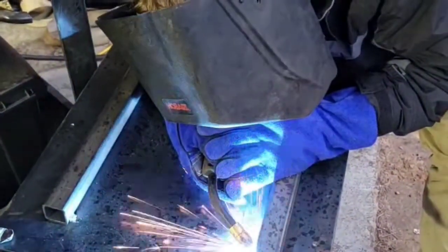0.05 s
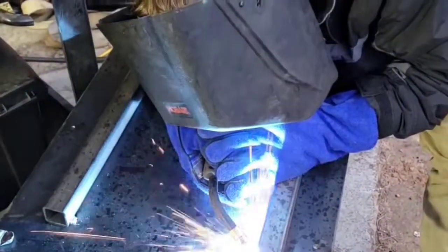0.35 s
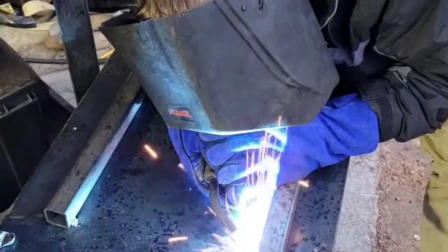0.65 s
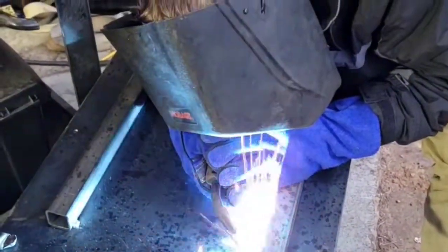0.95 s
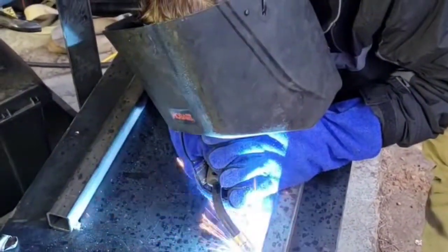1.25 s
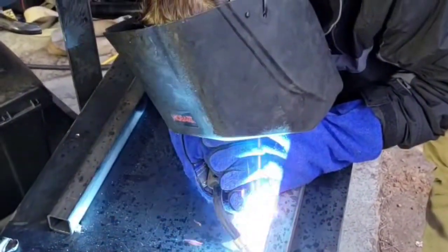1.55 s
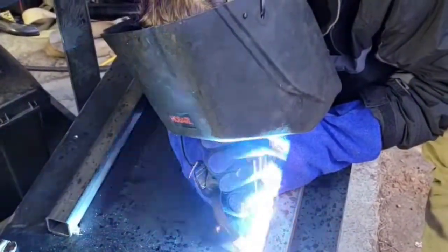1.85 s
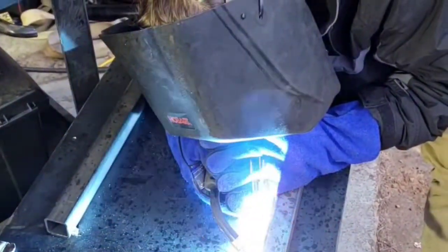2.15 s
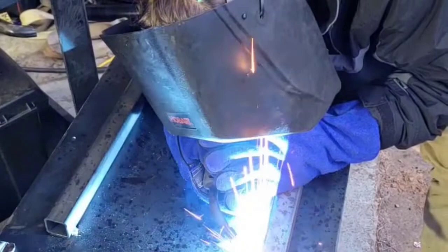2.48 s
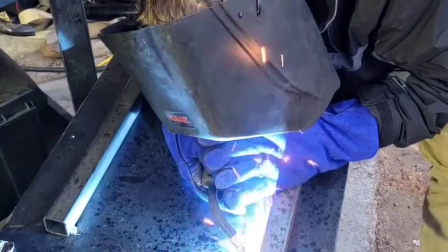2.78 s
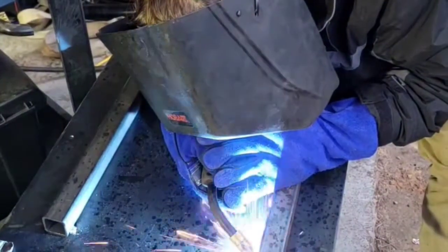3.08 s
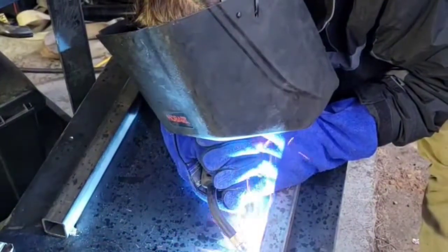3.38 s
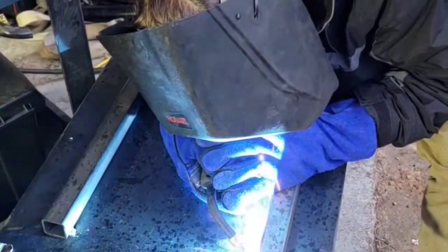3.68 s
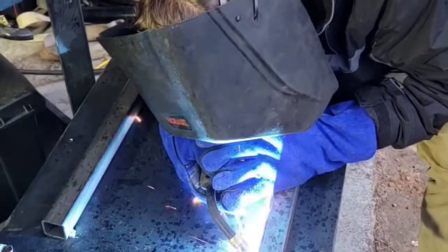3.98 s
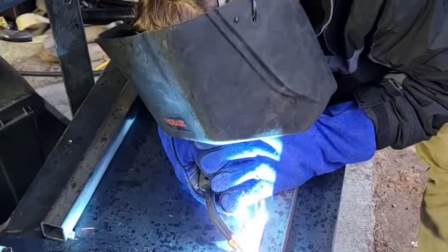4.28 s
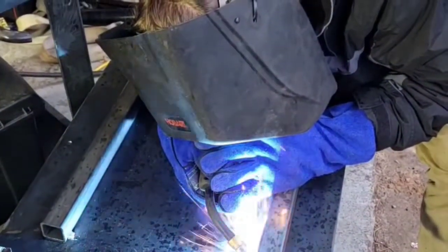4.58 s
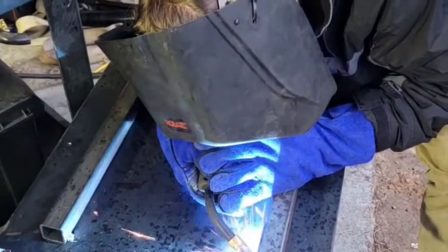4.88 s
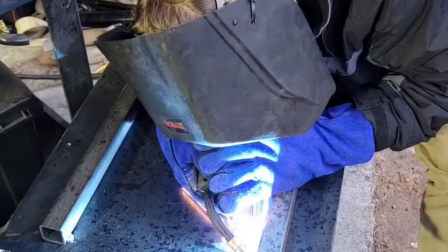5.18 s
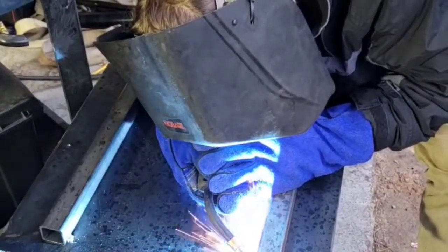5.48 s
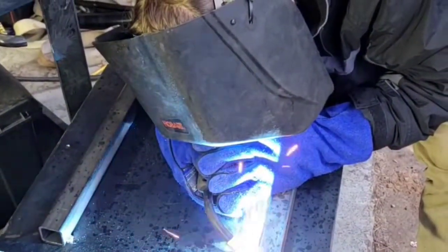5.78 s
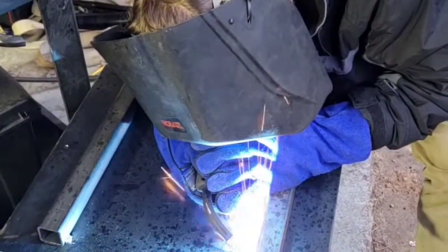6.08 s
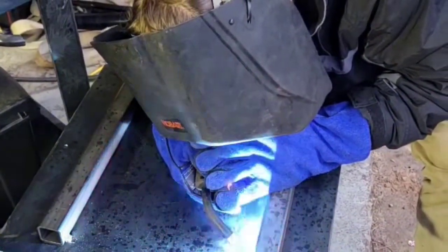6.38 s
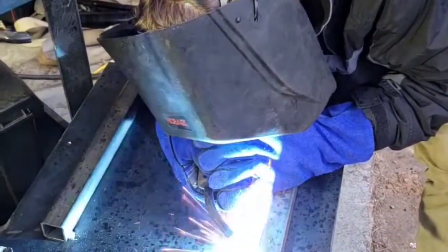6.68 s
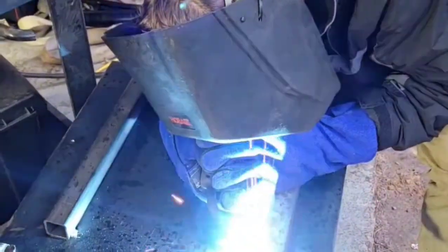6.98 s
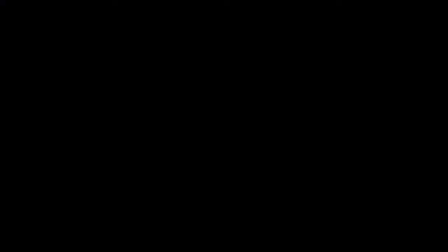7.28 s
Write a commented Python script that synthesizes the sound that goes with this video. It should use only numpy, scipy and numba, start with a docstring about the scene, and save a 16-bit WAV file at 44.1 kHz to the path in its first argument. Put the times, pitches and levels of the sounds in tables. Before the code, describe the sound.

Close arc welding on steel crackles and sizzles fiercely over a low generator hum, then everything stops abruptly.

```python
"""A fierce, close crackle over a sizzle: wire-feed arc welding on a steel bench. The wire shorts into the
molten pool about 115 times a second. Each re-ignition is an impulse, a sharp snap that reflects between bench
and helmet and excites the modes of the steel. An engine generator hums behind, and a limiter ducks the hum when
the crackle surges. Just before seven seconds the sound stops dead."""
import sys
import numpy as np
from scipy import signal
from scipy.fft import rfft, irfft
from scipy.io import wavfile
from scipy.ndimage import uniform_filter1d, minimum_filter1d, map_coordinates
from numba import njit

SR = 44100
rng = np.random.default_rng(int(sys.argv[2]) if len(sys.argv) > 2 else 0)


def master_out(mix):
    """Clip the mix to full scale and print it as 16-bit PCM to the path in sys.argv[1]."""
    frames = np.transpose(np.atleast_2d(mix))
    ceiling = np.clip(frames, -1, 1)
    pcm = np.round(ceiling * 32767).astype(np.int16)
    wavfile.write(sys.argv[1], SR, pcm)


N = 328098
T = np.arange(N) / SR
STOP_S = 6.987
FIRING_HZ = 30  # mean firing rate of the engine

# fierceness of the arc, driving snaps, sizzle and hiss (time [s], relative level [dB])
CRACKLE_LEVEL = [(0.0, -30), (0.21, -23.5), (0.54, -21.5), (0.62, -30), (0.83, -25), (0.93, -31.5),
                 (0.97, -22), (1.22, -29.5), (1.48, -21.5), (1.67, -30), (1.81, -19), (1.87, -26.5),
                 (2.37, -21.5), (2.41, -31.5), (2.53, -20.5), (2.86, -25.5), (3.32, -21), (3.48, -27),
                 (3.81, -20.5), (4.14, -30), (4.31, -21.5), (4.45, -28.5), (4.51, -23.5), (4.88, -26.5),
                 (5.11, -18.5), (5.4, -24), (6.22, -26.5), (6.34, -24), (6.44, -32), (6.47, -20),
                 (6.96, -25.5), (6.98, -18.5)]
# pace set by the wire feed (time [s], short-circuit rate [Hz])
SHORTING_RATE = [(0, 104), (.5, 117), (1.6, 122), (2, 117), (2.4, 98), (2.65, 118), (3.9, 120), (4.15, 106),
                 (5, 113), (5.8, 117), (6.3, 104), (7, 108)]
# bursts of big drops that stand out of the crackle (time [s], relative level [dB])
BIG_DROPS = [(0.1441, -5), (0.3132, -3), (0.3511, -3), (1.1109, -4), (1.3104, -4), (2.3565, -4),
             (2.8529, -7), (3.1308, -4), (3.6117, -6), (4.2378, -5), (4.5057, -6), (4.6872, -5),
             (5.2041, -3), (5.247, -4), (6.2317, -5), (6.2866, -8), (6.3121, -5), (6.3629, -4),
             (6.4632, -5), (6.7286, -4)]
# spans in which the arc burns long and the wire does not touch the pool (start [s], end [s])
LONG_ARC_SPANS = [(6.26, 6.284), (6.366, 6.46)]
# spectrum of a snap's ringing body (frequency [Hz], relative level [dB])
BODY_SPECTRUM = [(150, -46), (900, -28.5), (1700, -27.5), (2200, -18), (3000, -18), (4300, -16.5),
                 (5100, -9.5), (5750, -1), (6300, -8), (6720, 3), (7150, -9), (7550, -6), (8100, -21.5),
                 (10000, -40.5)]
# spectrum of a snap's sharp edge (frequency [Hz], relative level [dB])
EDGE_SPECTRUM = [(5000, -33), (8000, -10.5), (9300, -0.5), (11500, -1), (12800, -2.5), (13900, -1),
                 (15000, -2.5), (15800, -13)]
# spectrum of the arc's sizzle (frequency [Hz], relative level [dB])
SIZZLE_SPECTRUM = [(200, -13), (1200, -17), (3000, -6.5), (4700, -4.5), (6500, -1.5), (7400, -4.5),
                   (8500, -8), (11300, -11.5), (13700, -24.5), (15800, -35)]
# spectrum of the arc's thin hiss (frequency [Hz], relative level [dB])
HISS_SPECTRUM = [(6000, -24.5), (11500, -19.5), (12800, 0.5), (14000, 1), (15800, -17)]
# reflections by way of bench and helmet (mean delay [ms], gain [dB])
ECHO_PATHS = [(1.191, -1), (2.38, -30.5), (3.551, -3), (5.12, -9)]
# modes of the steel (frequency [Hz], time to decay by 60 dB [s], gain at resonance [dB])
STEEL_MODES = [(1450, .018, 2.5), (1911, 0.023, 8.5), (2127, 0.021, 8), (2622, 0.068, 8), (3684, 0.051, 5),
               (4130, .07, 1.5), (4900, 0.049, 8), (5090, 0.11, -0.5), (5950, 0.023, -6), (6540, 0.046, 4),
               (6400, .07, -12.5), (6993, .08, -1), (7450, .08, 4.5), (7420, 0.064, -10)]
# loudness of the generator's hum, dipping where the crackle surges (time [s], relative level [dB])
GENERATOR_LEVEL = [(0.0, -28), (0.06, -26.5), (0.54, -29.5), (0.56, -29), (2.98, -24.5), (3.77, -27.5),
                   (4.99, -26.5), (5.07, -28.5), (5.21, -26), (6.33, -27), (6.46, -23.5), (6.95, -25.5)]
# exhaust and casing tones (harmonic number [multiple of the firing rate], relative level [dB])
ENGINE_HARMONICS = [(1, -24), (2, 0.5), (3, -26), (4, -12), (5, 1), (6, -20), (7, -21.5), (8, -28.5),
                    (9, -27.5), (10, -23.5), (12, -30.5), (13, -24), (14, -23.5), (15, -19), (16, -16.5),
                    (17, -13.5), (18, -23), (19, -26), (21, -20), (23, -24), (28, -26.5), (36, -24),
                    (37, -25), (40, -20), (43, -26.5)]
# spectrum of the engine's clatter (frequency [Hz], relative level [dB])
CLATTER_SPECTRUM = [(20, -12.5), (55, 0.5), (100, -1), (160, 3), (260, -2.5), (370, -7.5), (480, 2.5),
                    (680, 0.5), (900, -8.5), (1200, -4.5), (1650, -6), (3500, -16)]


def arc(cycles):
    """Source and filter: snaps and sizzle excite the workshop; a long arc gives no snaps."""
    crackle_db, = curves(CRACKLE_LEVEL)
    long_arc = sum(1. * (T > start) * (T < end) for start, end in LONG_ARC_SPANS)
    burning = sizzle(cycles, crackle_db - crackle_db.mean(), long_arc)
    impulses = short_circuits(crackle_db) * (1 - long_arc)
    return workshop(snaps(impulses) + burning)


def short_circuits(crackle_db, jitter=.1, spread_db=4.04, lull_s=.02, lull_db=-3.5, lock=.68):
    """Relaxation oscillation: one impulse per re-ignition, in uneven runs that each big drop restarts."""
    rate_hz, = curves(SHORTING_RATE)
    drops_fed = np.cumsum(rate_hz) / SR
    chance = rng.standard_normal((4096, 2))
    big_s, big_db = np.transpose(BIG_DROPS)
    lull = sum((T > s - lull_s) & (T < s) for s in big_s)  # the crackle falls back before a burst
    slosh_db = 1.7 * walk(25)  # the sloshing pool gives stronger and weaker runs
    level_db = crackle_db + 7 + slosh_db + lull_db * lull
    impulses = np.zeros(N)
    impulses[(big_s * SR).astype(int)] = undb(big_db - 6.8)
    run_bounds = np.interp(np.r_[0, np.sort(big_s), STOP_S], T, drops_fed)
    ripple_hz = 4 * FIRING_HZ
    used = 0
    for start, end in zip(run_bounds[:-1], run_bounds[1:]):
        count = max(1, round(end - start))
        wait, size = chance[used:used + count].T
        used += count
        gaps = np.exp(jitter * wait)
        gaps[-1] *= 1.4  # a big drop takes longer to grow
        elapsed = np.cumsum(gaps)
        onset_s = np.interp(start + (end - start) * elapsed[:-1] / elapsed[-1], drops_fed, T)
        # drops tend to part on the crests of the rectified current
        onset_s -= lock * np.sin(2 * np.pi * (ripple_hz * onset_s - .64)) / (2 * np.pi * ripple_hz)
        at = (onset_s * SR).astype(int)
        strength = np.tanh((wait + size)[:-1] / 2)  # louder after a longer wait
        impulses[at] = undb(level_db[at] + spread_db * strength)
    return impulses


def snaps(impulses, body_db=3, edge_db=17):
    """Impulse response: each re-ignition gives a ringing, echoing body and a sharp edge."""
    return undb(body_db) * bounces(snap_body(impulses)) + undb(edge_db) * snap_edge(impulses)


def snap_body(impulses, spit_db=-26, spit_s=.00064):
    """Damped resonance: each impulse, with a brief spit of noise, rings for a few cycles."""
    t = T[:SR // 100]
    spit = convolve(impulses, np.exp(-t / spit_s)) * rng.standard_normal(N)
    response = minimum_phase(BODY_SPECTRUM)
    body = convolve(impulses + undb(spit_db) * spit, response / np.abs(response).max())
    body = disperse(body, hz=6500, width_hz=2200)
    return disperse(body, hz=2800, width_hz=1800)


def snap_edge(impulses, decay_s=.0004, path_loss_db=-4, spray_db=-9, brighten=.17):
    """Rough-surface scattering: the short waves of each snap break up on the steel."""
    t = T[:SR // 100]
    arrivals = np.exp(-t / decay_s)
    # the highest frequencies survive only the two shortest paths
    for k, (ms, db) in enumerate(ECHO_PATHS[:2]):
        age = t - ms / 1000
        arrivals += undb(db + path_loss_db * k) * (age > 0) * np.exp(-np.abs(age) / decay_s)
    # harder snaps have a brighter edge
    sharp = impulses * (impulses / impulses[impulses > 0].mean()) ** brighten
    # fine spatter sprays differently from every drop
    spray = convolve(sharp, arrivals / np.linalg.norm(arrivals)) * rng.standard_normal(N)
    scattered = scatter(sharp, arrivals, count=6)
    edge = convolve(scattered + undb(spray_db) * spray, minimum_phase(EDGE_SPECTRUM))
    for hz in 13100, 13700, 14300:  # the brightest part lingers for a few milliseconds
        edge = disperse(edge, hz, width_hz=450)
    return edge


def sizzle(cycles, surge_db, long_arc, fizz_db=-32, hiss_db=-35, ripple=.067, fade_db=-10):
    """Amplitude modulation: noise pulses with the rectified current and, like the hiss, follows surges."""
    current = 1 + ripple * np.cos(2 * np.pi * (4 * cycles - .8))
    fizz = rng.standard_normal(N) * undb(3 * walk(550)) * current
    fizz = unit(convolve(fizz, minimum_phase(SIZZLE_SPECTRUM))) * undb(fizz_db + .49 * surge_db)
    hiss = noise(HISS_SPECTRUM) * undb(hiss_db + .7 * surge_db)
    burning = fizz + hiss
    # the top octave fades while the arc burns long
    treble = signal.sosfiltfilt(signal.butter(3, 7800, "high", fs=SR, output="sos"), burning)
    treble_gain = undb(fade_db * uniform_filter1d(long_arc, size=2048))
    return burning + (treble_gain - 1) * treble


def bounces(x, drift=.0025):
    """Comb filtering: close echoes add to the sound, their paths shortening as the torch travels."""
    stretch = 1 + drift * (1 - 2 * T / STOP_S)
    return x + sum(undb(db) * map_coordinates(x, [(T - ms / 1000 * stretch) * SR], order=3)
                   for ms, db in ECHO_PATHS)


def workshop(x, near_db=-13, near_t60=.06, room_db=-12, room_t60=.084, absorb_hz=12000):
    """Modal ringing and reverberation: the steel rings; nearby things and the room add a duller tail."""
    t = T[:SR // 4]
    ring, tail = 0, 0
    for hz, t60, db in STEEL_MODES:
        decay = undb(-60 * t / t60)
        ring = ring + undb(db) * np.cos(2 * np.pi * hz * t) * 2 * decay / decay.sum()
    for db, t60 in (near_db, near_t60), (room_db, room_t60):
        decay = undb(-60 * t / t60) * np.minimum(t / .0055, 1)
        tail = np.hypot(tail, undb(db) * decay / np.linalg.norm(decay))
    dull = signal.sosfilt(signal.butter(1, absorb_hz, fs=SR, output="sos"), x)
    return x + convolve(x, ring) + np.linalg.norm(tail) * scatter(dull, tail, count=4)


def scatter(x, envelope, count):
    """Diffuse reflection: random echo patterns under one envelope succeed each other as the torch moves."""
    out = 0
    for k in range(count):
        response = rng.standard_normal(len(envelope)) * envelope
        share = np.cos(np.pi / 2 * np.clip(T / T[-1] * (count - 1) - k, -1, 1))
        out = out + share * convolve(x, response / np.linalg.norm(response))
    return out


def disperse(x, hz, width_hz):
    """Group delay: a resonant all-pass path holds back the frequencies around its centre."""
    radius = np.exp(-np.pi * width_hz / SR)
    poles = [1, -2 * radius * np.cos(2 * np.pi * hz / SR), radius ** 2]
    return signal.lfilter(poles[::-1], poles, x)


def generator(cycles, hum_db=.9, clatter_db=-7.5, knock_depth=.93, knock_width=.036):
    """Harmonic series: a four-stroke single hums at multiples of its firing rate and knocks twice a cycle."""
    level_db, = curves(GENERATOR_LEVEL)
    hum = 0
    for order, db in ENGINE_HARMONICS:
        # the low tones are nearly steady, the casing tones vary from firing to firing
        waver_db = (3 * min(order / 20, 1) - .5) * walk(22)
        hum = hum + undb(db + waver_db) * np.sin(2 * np.pi * (order * cycles + rng.random()))
    knocks = sum(np.exp(-((cycles % 1 - phase) / knock_width) ** 2) for phase in (.48, .67))
    clatter = unit(noise(CLATTER_SPECTRUM) * (1 + knock_depth * knocks))
    return undb(level_db) * (undb(hum_db) * unit(hum) + undb(clatter_db) * clatter)


def engine_cycles():
    """Phase modulation: the count of engine cycles wanders as the governor lets the speed hunt."""
    return FIRING_HZ * T + .1 * walk(2.5) / (2 * np.pi)


def cooling_fan(hz=199.3, level_db=-50):
    """Simple harmonic motion: the fan gives one faint, steady tone."""
    return undb(level_db) * unit(np.sin(2 * np.pi * hz * T))


def undb(db):
    """Decibel law: level to amplitude ratio."""
    return 10 ** (np.asarray(db) / 20)


def unit(x):
    """Normalisation to rms 1."""
    return x / np.sqrt(np.mean(x ** 2))


def curves(table):
    """Linear interpolation of each column through time."""
    times, *columns = np.transpose(table)
    return [np.interp(T, times, column) for column in columns]


def walk(rate_hz):
    """Band-limited random fluctuation with a spread near 1."""
    knots = signal.resample(rng.standard_normal(4096), 4096 * 8)
    return np.interp(T * rate_hz, np.arange(len(knots)) / 8, knots)


def convolve(x, response):
    """Linear filtering by an impulse response."""
    return signal.fftconvolve(x, response)[:N]


def minimum_phase(spectrum, size=4096):
    """Causality: folding the cepstrum gives the most compact response with this spectrum."""
    hz, db = np.transpose(spectrum)
    bins_hz = np.maximum(np.arange(size // 2 + 1) * SR / size, 1)
    magnitude = undb(np.interp(np.log(bins_hz), np.log(hz), db))
    cepstrum = irfft(np.log(magnitude))
    cepstrum[1:size // 2] *= 2
    cepstrum[size // 2 + 1:] = 0
    return irfft(np.exp(rfft(cepstrum)))


def noise(spectrum):
    """Spectral shaping of white noise, at rms 1."""
    return unit(convolve(rng.standard_normal(N), minimum_phase(spectrum)))


@njit
def held_peak(x, retention):
    """Envelope detection: jumps to each peak, then decays exponentially."""
    envelope, peak = np.empty(len(x)), 0.
    for i in range(len(x)):
        peak = max(abs(x[i]), peak * retention)
        envelope[i] = peak
    return envelope


def limiter(x, threshold_db=-5.5, ratio=5, release_s=.05):
    """Dynamic compression: the gain falls just ahead of a loud peak and recovers slowly."""
    peak = held_peak(x, np.exp(-1 / (release_s * SR)))
    gain = np.maximum(peak / undb(threshold_db), 1) ** (1 / ratio - 1)
    return x * uniform_filter1d(minimum_filter1d(gain, size=129), size=129)


def scene():
    """Superposition: arc, generator and fan sound together until the whole sound breaks off at once."""
    cycles = engine_cycles()
    running = np.clip((STOP_S - T) / .002, 0, 1)
    return ((arc(cycles) + generator(cycles) + cooling_fan()) * running)[None]


def record(dry):
    """Saturation and band limiting: peaks are limited and rounded; deep rumble and the very top are cut."""
    rumble_cut = signal.butter(1, 20, "high", fs=SR, output="sos")
    top_cut = signal.ellip(10, .2, 80, 15650, fs=SR, output="sos")
    rounded = np.tanh(limiter(dry[0]))
    return signal.sosfilt(top_cut, signal.sosfilt(rumble_cut, rounded))[None]


dry = scene()
out = record(dry)
master_out(out)
```